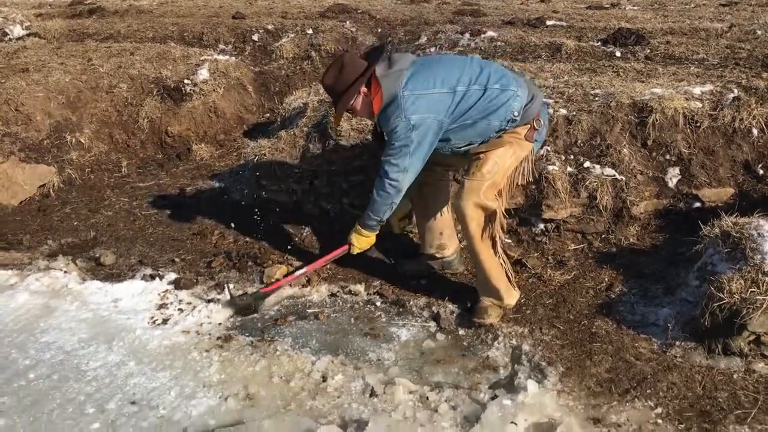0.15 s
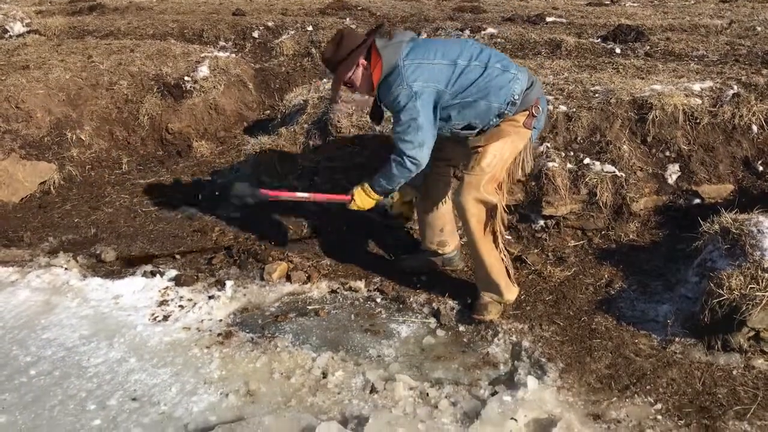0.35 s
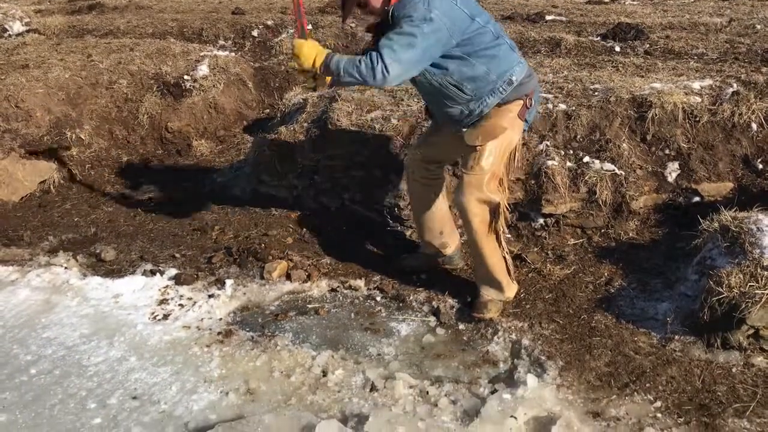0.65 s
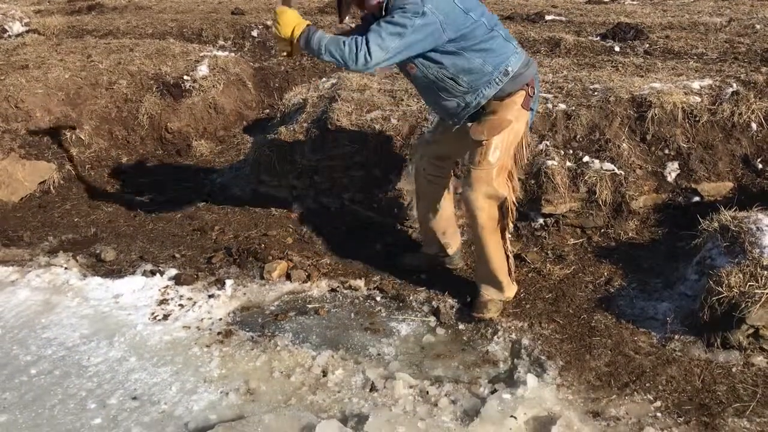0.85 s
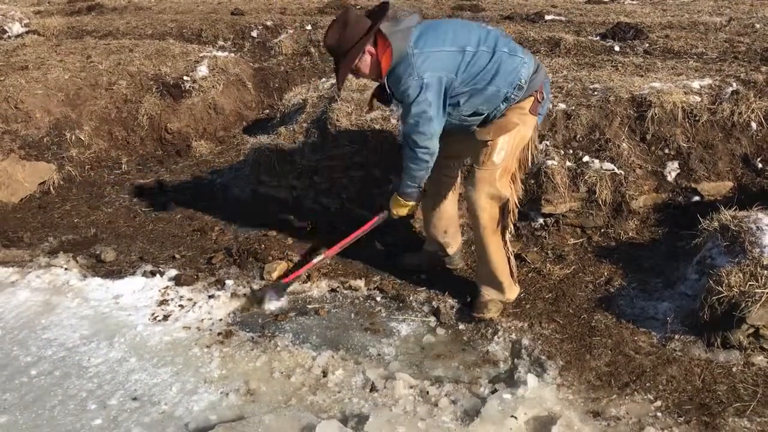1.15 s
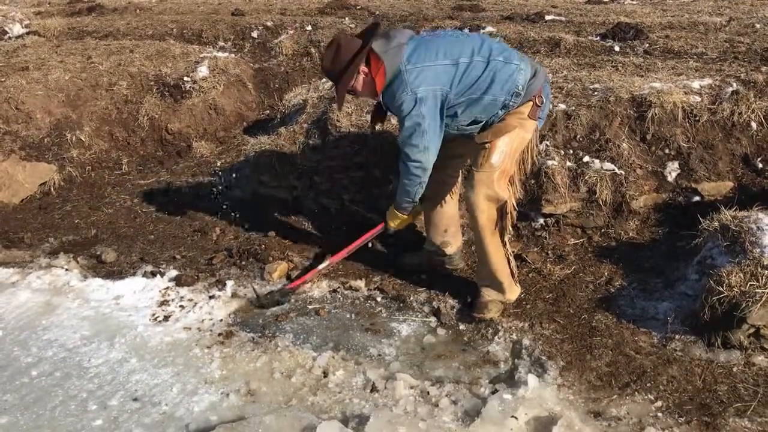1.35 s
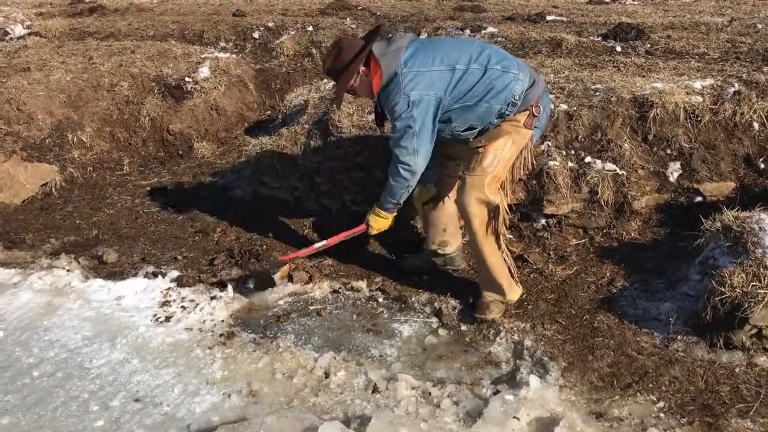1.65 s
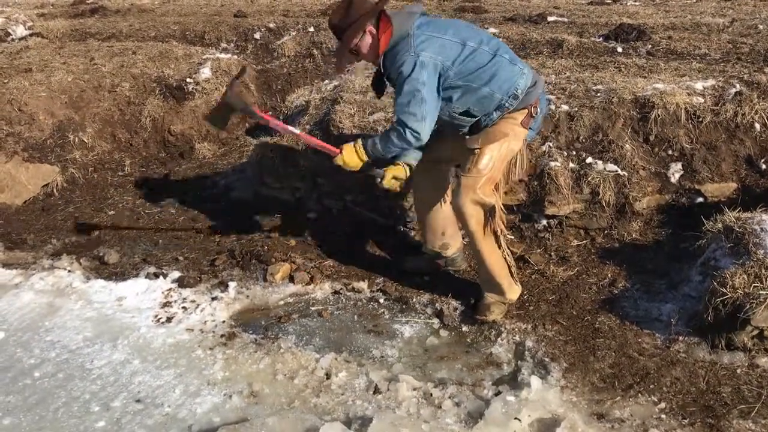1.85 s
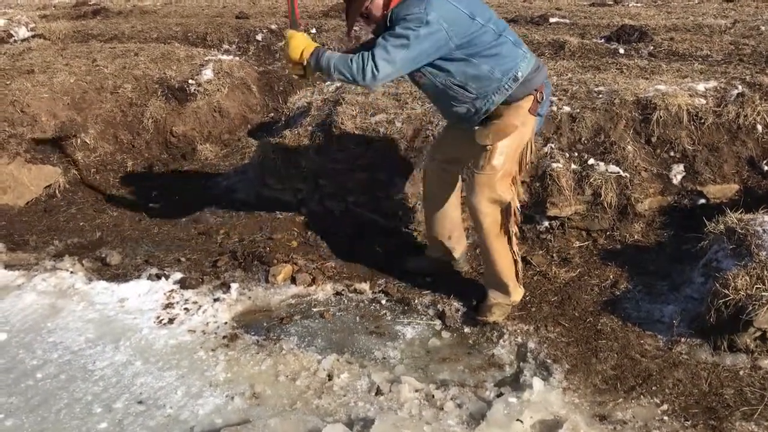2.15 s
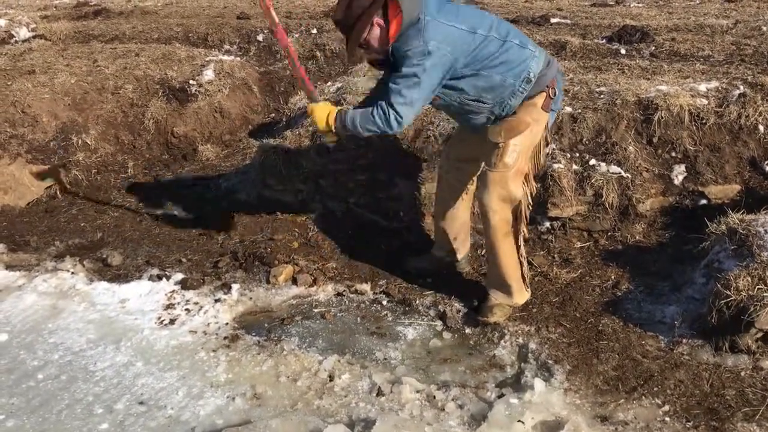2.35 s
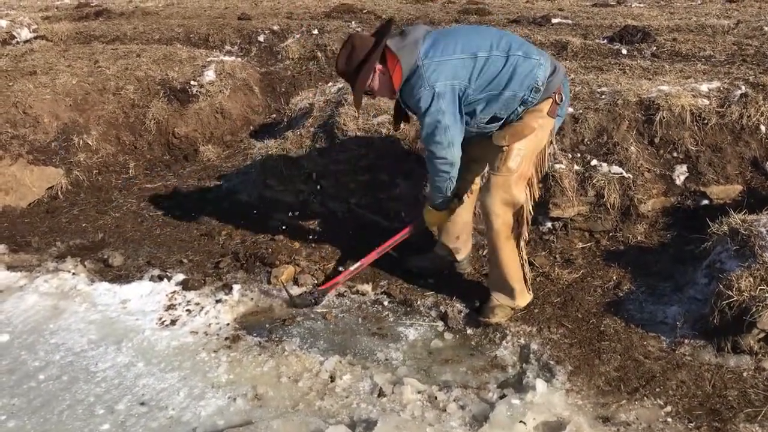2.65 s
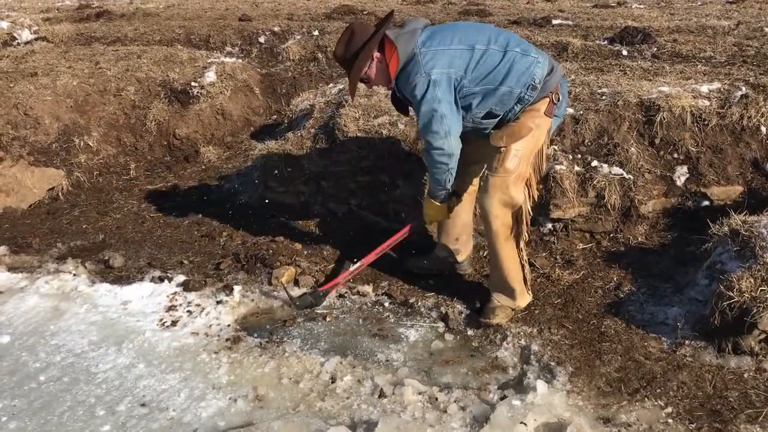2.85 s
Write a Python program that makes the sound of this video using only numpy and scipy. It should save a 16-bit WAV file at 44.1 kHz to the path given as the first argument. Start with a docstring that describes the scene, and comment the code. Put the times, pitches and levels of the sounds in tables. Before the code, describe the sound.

An axe chops ice three times with sharp cracks while wind rumbles on the microphone.

```python
"""At the edge of a frozen pond, a long-handled axe chops the ice: three short, dry cracks,
each with a brief ring of blade and ice. After each one, thrown chips and water patter down
and the blade drags out of the slush. A rising wind buffets the microphone with rumble
and sudden popping eddies, over the faint hiss of the open field."""
import sys
import numpy as np
from scipy.fft import rfft, irfft, next_fast_len
from scipy.io import wavfile
from scipy.ndimage import map_coordinates

SR = 44100
rng = np.random.default_rng(int(sys.argv[2]) if len(sys.argv) > 2 else 0)


def wav_record(signal):
    """Record a signal, one row per channel, as 16-bit PCM in the file named by sys.argv[1]."""
    frames = np.transpose(np.atleast_2d(signal))
    bounded = np.clip(frames, -1, 1)
    # unit amplitude maps onto the largest positive 16-bit level
    quanta = np.round(bounded * 32767).astype(np.int16)
    wavfile.write(sys.argv[1], SR, quanta)


N = 132300

# The axe hits: start_s, crack_db, tilt_db_per_octave, bite_hz, ring_db, ring_pitch_ratio
AXE_BLOWS = [(0.0, -16, -3, 1900, -12.5, 0.92), (1.3525, -14, -0.9, 6480, -2.5, 0.97),
             (2.7108, -12, -4, 3720, -6, 0.94)]
# The ring of blade and ice: pitch_hz, level_db, t60_s
RING_MODES = [(645, -7.5, 0.033), (1048, -0.5, 0.028), (1190, -6.5, 0.031), (1568, -16.5, 0.042),
              (1881, -15, 0.039), (2533, 6.5, 0.0092), (3440, 5.5, 0.01)]
# The EQ of breaking ice: frequency_hz, gain_db
CRACK_EQ = [(200, -4.5), (700, -7.5), (2000, -5), (3500, -4.5), (4600, -8), (6500, -6), (8000, -12),
            (11500, -6), (15500, -9)]


def axe(hold_s=0.0023, crack_t60_s=0.04, crumble_db=-21.5, crumble_t60_s=0.19, ring_rise_s=0.0038):
    """The ice cracks with its own bite each time, blade and sheet ring briefly, and crumbs settle."""
    out, t = np.zeros(N), np.arange(SR // 4) / SR
    for start_s, crack_db, tilt_db, bite_hz, ring_db, pitch_ratio in AXE_BLOWS:
        bite = lambda hz: amp(6 * np.exp(-(np.log2((hz + 1) / bite_hz) / .6) ** 2))  # a 6 dB bell
        crack = grit(lambda hz: colour(CRACK_EQ, tilt_db)(hz) * bite(hz), len(t))
        crack *= amp(-60 * np.maximum(t - hold_s, 0) / crack_t60_s)
        crumbs = grit(colour(CRACK_EQ, tilt_db - 3), len(t))  # a darker tail
        crumbs *= amp(crumble_db - 60 * t / crumble_t60_s)
        ring = np.zeros(len(t))
        for hz, level_db, t60_s in RING_MODES:
            decay = amp(level_db + rng.normal(0, 1) - 60 * t / t60_s)
            ring += decay * np.sin(2 * np.pi * (hz * pitch_ratio * t + rng.random()))
        ring *= 1 - np.exp(-t / ring_rise_s)
        add(out, start_s, amp(crack_db) * (crack + crumbs) + amp(ring_db) * ring)
    return out


def grit(response, size, grain_db=4.5):
    """Crunch of rms 1: tiny noise grains of very unequal strength."""
    grain_gains = amp(grain_db * np.clip(rng.standard_normal(size), -2, 2))
    envelope = np.repeat(grain_gains, 32)[:size]
    return unit(filtered(envelope * rng.standard_normal(size), response))


# Swells of falling spray and slush: peak_s, half_length_s, level_db, tilt_db_per_octave
SHOWERS = [(0.032, 0.024, -53.5, 1.5), (.131, 0.013, -54, 0), (0.198, 0.017, -47, 0.5),
           (0.379, 0.028, -50, 1), (0.831, 0.069, -65, 4), (1.476, 0.037, -60.5, -2),
           (1.584, 0.0082, -35, -7), (1.617, 0.029, -53.5, 0), (1.826, 0.066, -56.5, 1),
           (1.951, 0.0034, -38.5, -1), (2.067, 0.043, -59, -1.5), (2.797, 0.082, -63, -1.5),
           (2.944, 0.012, -39.5, -2.5)]
# The EQ of wet ice: frequency_hz, gain_db
SLUSH_EQ = [(400, -22.5), (1000, 2.5), (1350, -4.5), (1750, 0), (2200, -8.5), (3400, -5), (4300, -9),
            (8000, -17), (15000, -16)]


def slush(crackle_db=-71):
    """Showers of clinking chips swell and fade over fine spray; wet ice crackles faintly throughout."""
    high_pass = lambda hz: hz ** 2 / (hz ** 2 + 7000 ** 2)
    out = amp(crackle_db) * chips(high_pass, N, count=1000)
    t = np.arange(-SR // 3, SR // 3) / SR
    for peak_s, half_length_s, level_db, tilt_db in SHOWERS:
        eq = colour(SLUSH_EQ, tilt_db)
        patter = chips(eq, len(t))
        spray = .4 * noise(eq, len(t))
        add(out, peak_s + t[0], amp(level_db) * (patter + spray) / np.cosh(t / half_length_s))
    return out


def chips(response, size, count=1500, decay_cycles=5):
    """A patter of rms 1: each chip clinks for a few cycles at its own pitch."""
    when, pitch, softness = rng.random((count, 3)).T[..., None]
    hz, age = 900 * 16 ** pitch, np.arange(SR // 50)
    cycles = hz * age / SR
    strength = hz / (softness + .03) ** .6  # a few chips stand out
    clinks = strength * np.exp(-cycles / decay_cycles) * np.sin(2 * np.pi * cycles)
    positions = (when * size).astype(int) + age
    patter = np.bincount(positions.ravel(), clinks.ravel(), size)[:size]
    return unit(filtered(patter, response))


# Stray splinters and drops: start_s, level_db, centre_hz
ICE_TICKS = [(.402, -35.5, 2440), (.417, -32.5, 12000), (.624, -45, 6860), (.631, -30, 10300),
             (.898, -38, 10100), (1.916, -46, 12900), (2.185, -41.5, 5820), (2.927, -45, 1500)]


def ticks(t60_s=0.0091, half_width_octaves=0.67):
    """Single splinters and drops click brightly, each a snap of band-passed noise."""
    out, t = np.zeros(N), np.arange(SR // 20) / SR
    for start_s, level_db, centre_hz in ICE_TICKS:
        band = lambda hz: 1 / (1 + (np.log2((hz + 1) / centre_hz) / half_width_octaves) ** 2)
        add(out, start_s, amp(level_db - 60 * t / t60_s) * noise(band, len(t)))
    return out


# The wind's fader ride: time_s, strength_db
WIND_STRENGTH = [(0, -45), (0.088, -24), (.3, -35.5), (0.479, -19), (.63, -28.5), (0.739, -23.5),
                 (1.05, -24), (1.2, -32.5), (1.288, -22), (1.5, -30), (1.64, -22.5), (1.92, -16),
                 (2.17, -21), (2.451, -16.5), (2.6, -19.5), (2.78, -14.5), (2.87, -23), (3, -21.5)]
# The EQ of wind on the microphone: frequency_hz, gain_db
RUMBLE_EQ = [(20, -14.5), (32, -9.5), (45, 3.5), (62, 3.5), (100, -1), (180, -7), (300, -19), (500, -52),
             (900, -81)]


def wind(pop_count=460, pop_hz=181, pop_db=-31, swirl_db=5.5, clump_db=7):
    """A rumble that follows the wind's strength, sputtering with clumps of small pops."""
    strength_db = np.interp(np.arange(N) / SR, *np.transpose(WIND_STRENGTH))
    gust_db = strength_db - strength_db.mean()
    swirl = np.tanh(wobble(55))
    rumble = unit(noise(colour(RUMBLE_EQ), N) * amp(swirl_db * swirl))
    out = amp(strength_db - 1) * rumble
    sputter_db = pop_db + 0.44 * gust_db + clump_db * swirl
    for _ in range(pop_count):
        i = int(rng.random() * N)
        level_scatter, pitch_scatter = np.clip(rng.standard_normal(2), -2, 2)
        pulse = pop(pop_hz * np.exp(.2 * (pitch_scatter / 2 + swirl[i])))
        add(out, (i - len(pulse) / 2) / SR, amp(sputter_db[i] + 2 * level_scatter) * pulse)
    return out


# Three deep thumps of wind on the microphone, each under an eddy's pop: centre_s, level_db
WIND_THUMPS = [(1.708, -3.5), (2.069, -4), (2.486, -7.5)]
# Eddies hitting the microphone: centre_s, relative_level_db, pitch_hz
EDDY_POPS = [(0.418, -24.0, 356), (0.456, -21.0, 200.0), (0.487, -25.5, 180.0), (0.659, -13.5, 286),
             (0.724, -20, 250.0), (0.745, -25, 286), (0.777, -17.5, 220.0), (0.851, -20.5, 257),
             (0.883, -19.0, 225), (0.973, -25, 240.0), (1.009, -23.5, 248), (1.055, -24, 189),
             (1.113, -11, 477), (1.382, -22.0, 320.0), (1.416, -19.5, 270.0), (1.433, -12.5, 247),
             (1.52, -20.5, 206), (1.631, -21, 270.0), (1.69, -17.5, 282), (1.71, -16, 516),
             (1.803, -21, 497), (1.846, -21.5, 197), (1.934, -16.5, 390.0), (1.996, -24.5, 240.0),
             (2.039, -16.0, 269), (2.052, -16, 327), (2.071, -12, 240.0), (2.154, -16.0, 240.0),
             (2.194, -22, 305), (2.255, -13.0, 230.0), (2.278, -21, 290.0), (2.339, -24, 420),
             (2.364, -22.0, 208), (2.381, -17.5, 248), (2.423, -24, 260.0), (2.45, -14, 350),
             (2.486, -12.5, 323), (2.553, -20.5, 336), (2.599, -21.0, 260.0)]


def eddies(thump_hz=73.4, thump_width_s=0.0059, spacing_s=0.00406, boost_db=3.5, flank_db=-6.5):
    """Each eddy is a round pop flanked by weaker, duller ones; three have a deep thump under them."""
    out, t = np.zeros(N), np.arange(-SR // 20, SR // 20) / SR
    thump = -np.sin(2 * np.pi * thump_hz * t) * np.exp(-(t / thump_width_s) ** 2)
    for centre_s, level_db in WIND_THUMPS:
        add(out, centre_s + t[0], amp(level_db) * thump)
    for centre_s, level_db, pitch_hz in EDDY_POPS:
        for side in range(-2, 3):
            pulse = amp(level_db + boost_db + abs(side) * flank_db) * pop(pitch_hz * 0.75 ** abs(side))
            jitter = np.sign(side) * (rng.random() - .5)
            add(out, centre_s + spacing_s * (side + jitter) - len(pulse) / 2 / SR, pulse)
    return out


def pop(centre_hz, edge_db=-23.5, edge_ratio=1.91, size=2048):
    """One rounded pressure pulse with a faint sharper edge, of peak 1, centred in its buffer."""
    ratio = np.fft.rfftfreq(size, 1 / SR) / centre_hz
    hump = lambda r: (r * np.exp(-r)) ** 2
    spectrum = hump(ratio) + amp(edge_db) * hump(ratio / edge_ratio)
    pulse = np.fft.fftshift(irfft(spectrum * np.exp(2j * np.pi * rng.random())))
    return pulse / np.abs(pulse).max()


# The EQ of the open-air bed: frequency_hz, gain_db
AIR_EQ = [(100, 2), (1000, 0.5), (2000, -10.5), (15000, -18.5)]


def air(level_db=-62.5, lull_db=-6, lull_at_s=0.697, lull_width_s=.06):
    """The hiss of the open field, which dips briefly."""
    lull = np.exp(-((np.arange(N) / SR - lull_at_s) / lull_width_s) ** 2)
    return amp(level_db + lull_db * lull) * noise(colour(AIR_EQ), N)


def amp(db):
    """Decibels to gain."""
    return 10 ** (np.asarray(db) / 20)


def unit(x):
    """Scale to rms 1."""
    return x / np.sqrt(np.mean(x ** 2) + 1e-20)


def colour(points, tilt_db=0):
    """An EQ curve through (Hz, dB) points, tilted per octave about 2.5 kHz."""
    points_hz, points_db = np.transpose(points)
    curve_db = lambda hz: np.interp(np.log(hz + 1), np.log(points_hz), points_db)
    return lambda hz: amp(curve_db(hz) + tilt_db * np.log2((hz + 100) / 2500))


def filtered(x, response):
    """Pass x through an EQ curve."""
    padded = next_fast_len(len(x) + 8192)
    return irfft(rfft(x, padded) * response(np.fft.rfftfreq(padded, 1 / SR)), padded)[:len(x)]


def noise(response, size):
    """Coloured noise of rms 1."""
    return unit(filtered(rng.standard_normal(size), response))


def wobble(rate):
    """A smooth random curve, rate knots a second."""
    return map_coordinates(rng.standard_normal(4096), [np.arange(N) * rate / SR], mode="wrap")


def add(out, start_s, x):
    """Mix x into out from start_s on."""
    i = int(round(start_s * SR))
    x, i = x[max(-i, 0):], max(i, 0)
    out[i:i + len(x)] += x[:max(N - i, 0)]


def scene():
    """Axe, slush and wind in the open air, in mono."""
    return (axe() + slush() + ticks() + wind() + eddies() + air())[None]


def record(dry, low_cut_hz=34, ceiling=.7, high_cut_hz=15850):
    """A low cut, a soft clip that rounds the highest peaks, then a steep high cut."""
    trimmed = filtered(dry[0], lambda hz: hz ** 6 / (hz ** 6 + low_cut_hz ** 6))
    rounded = trimmed / (1 + (trimmed / ceiling) ** 6) ** (1 / 6)
    return filtered(rounded, lambda hz: 1 / (1 + (hz / high_cut_hz) ** 80))[None]


dry = scene()
out = record(dry)
wav_record(out)
```